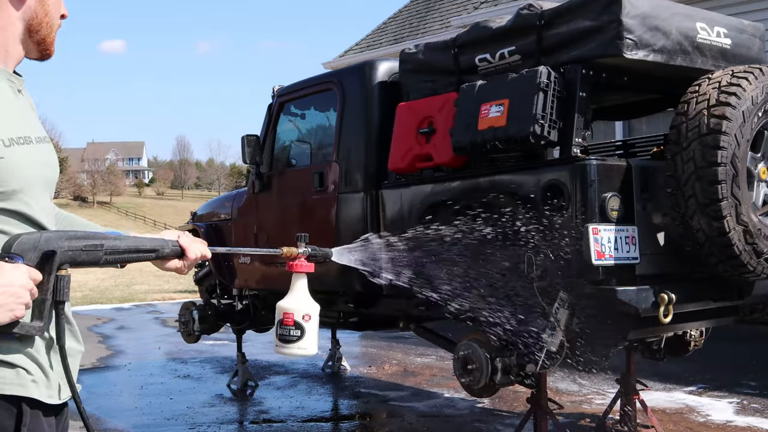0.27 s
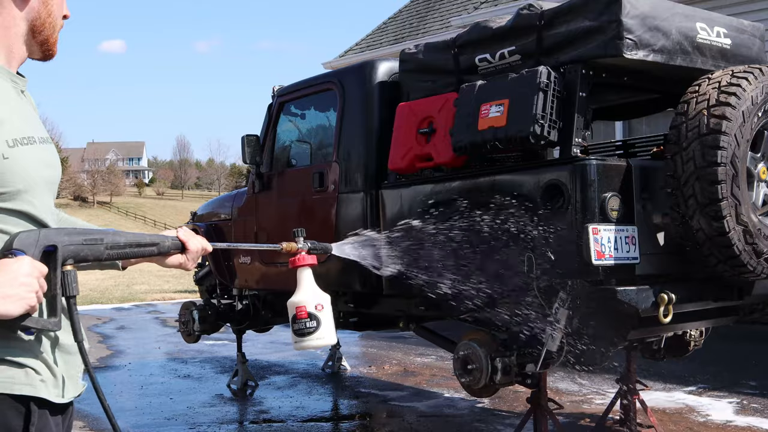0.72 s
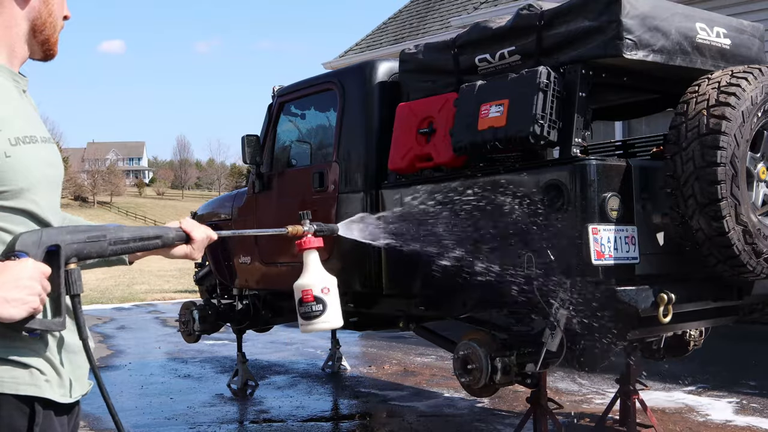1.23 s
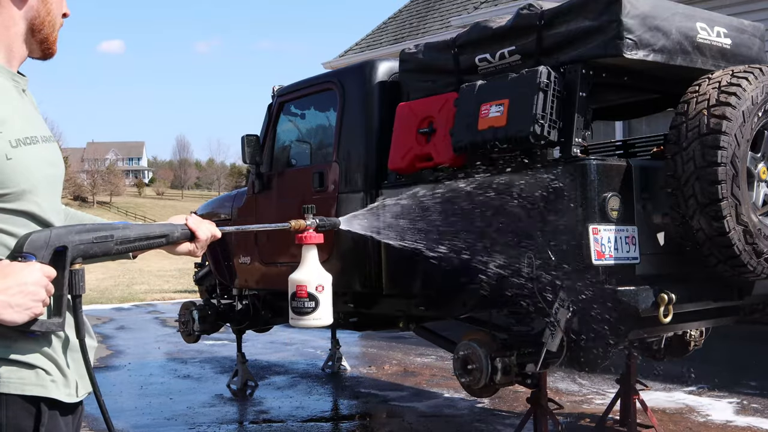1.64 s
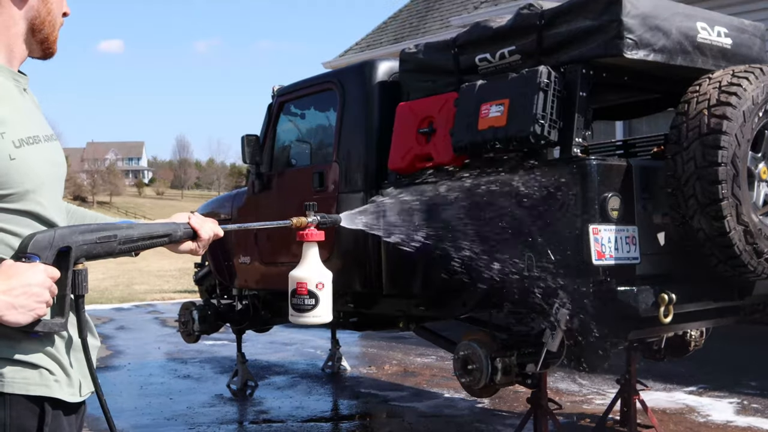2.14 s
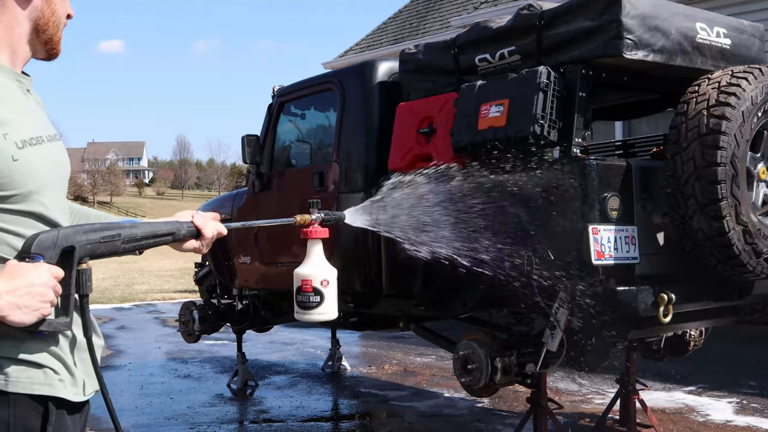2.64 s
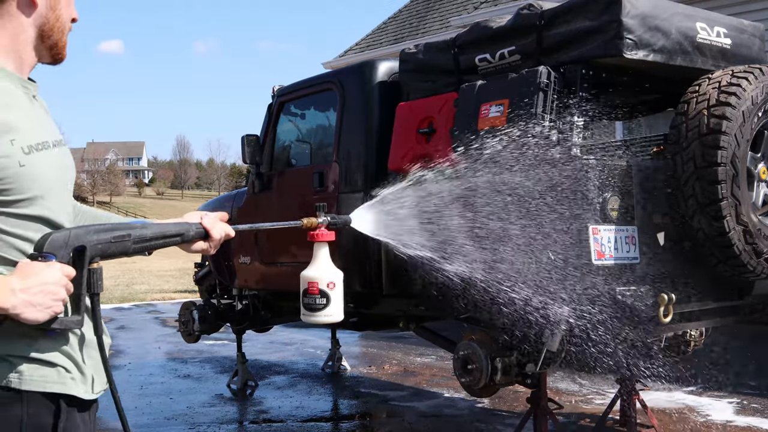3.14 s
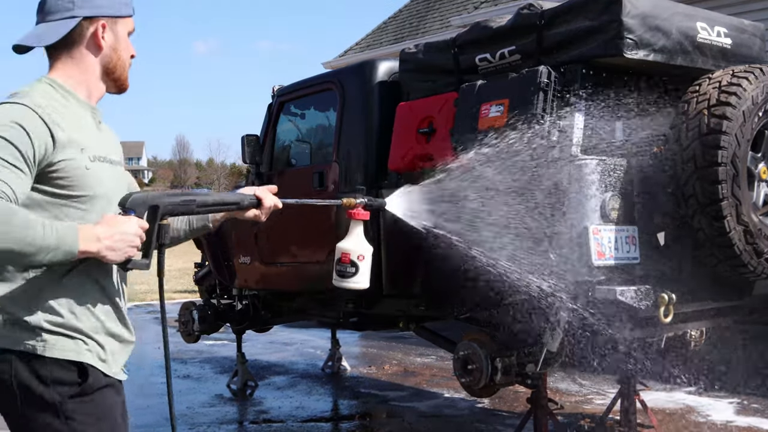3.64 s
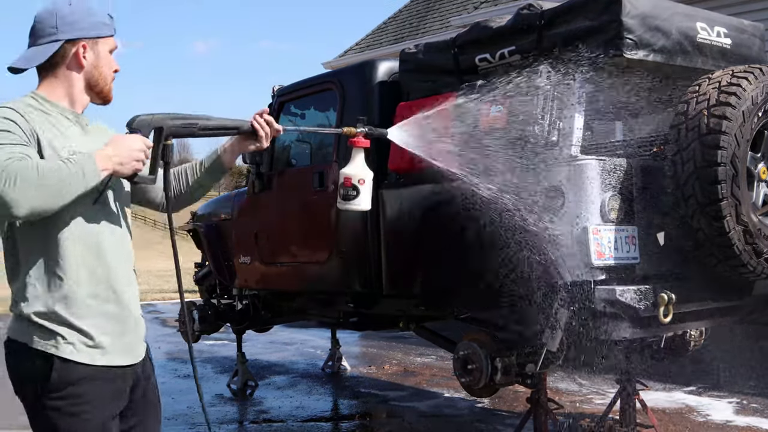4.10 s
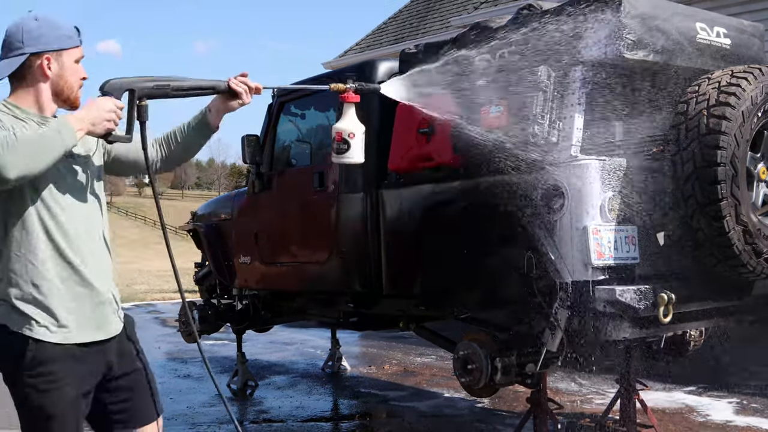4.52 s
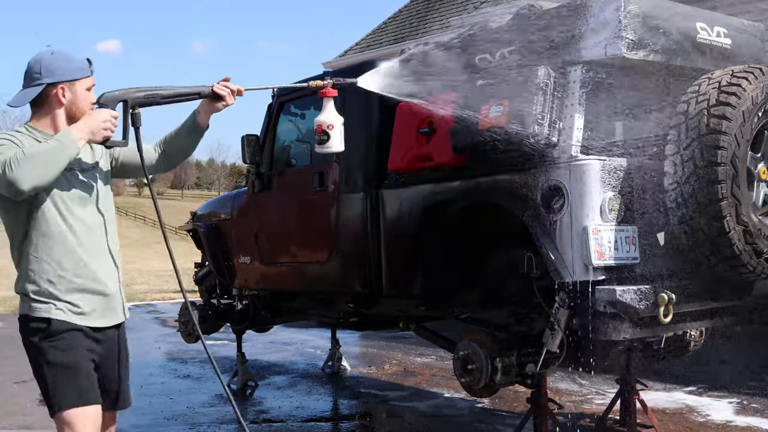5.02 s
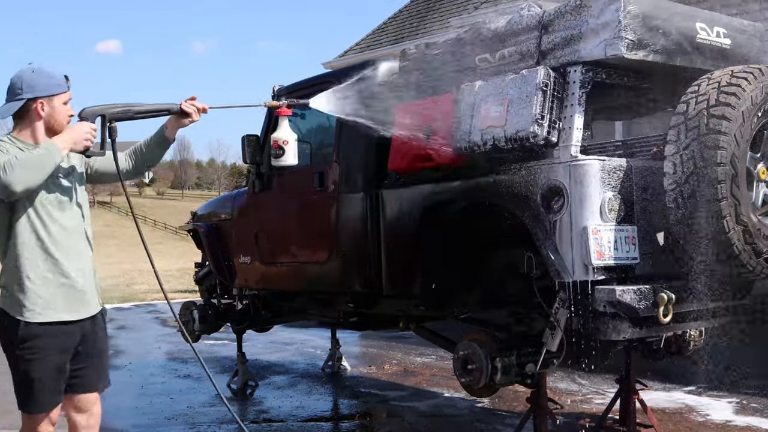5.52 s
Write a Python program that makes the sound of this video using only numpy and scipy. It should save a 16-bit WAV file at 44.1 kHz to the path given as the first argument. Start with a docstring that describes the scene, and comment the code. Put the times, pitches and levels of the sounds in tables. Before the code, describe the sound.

An electric pressure washer runs outdoors for the whole six seconds or so, heard in stereo and mostly on the left. Its pump makes a hard, fast buzz, with a high gear whine and a rushing roar, settling to a steady pitch within the first second. Underneath, foam spray hits a vehicle's body as a dense, finely pattering hiss. From about 2.6 to 3.4 seconds the top of the hiss dulls slightly. Around 4 seconds the roar and spray lift a little. From about 4.4 to 5 seconds the buzz turns hollow and the roar thins, then the earlier tone returns. At about 5.1 seconds the spray grows louder and brighter, and two fat drops hit a panel with very short, bright ticks at about 5.4 and 5.6 seconds. The machine and spray are still going at the end.

```python
"""A hard buzz with a whine and a roar on the left, over the hiss of foam on a car body, outdoors in stereo.
It is an electric pressure washer: a fast motor drives a three-piston pump through gears.
Periodic valve knocks make the buzz, meshing teeth the whine, and fan, casing and water the roar.
For about half a second the buzz turns hollow and shifts colour, and the roar's middle thins.
The spray is a dense patter of impacts; near the end it grows louder and two fat drops ring on a panel."""
import sys
import numpy as np
from scipy import signal
from scipy.fft import rfft, irfft
from scipy.io import wavfile
from scipy.ndimage import uniform_filter1d

SR = 44100
rng = np.random.default_rng(int(sys.argv[2]) if len(sys.argv) > 2 else 0)


def store_wav(level_fs):
    """Save 16-bit WAV to argv[1]."""
    pcm = np.round(np.clip(np.atleast_2d(level_fs), -1, 1) * 32767)
    wavfile.write(sys.argv[1], SR, pcm.T.astype(np.int16))


N = 254016
STEP = 64  # samples between the ticks of slow controls
TICKS = np.arange(0, N + STEP, STEP)
TICK_S = TICKS / SR

# Valve knocks in one shaft turn: place_turns, strength
KNOCKS = [(.015, .82), (.345, .61), (.5, .83), (.743, .38), (.822, .77)]


def pump_buzz(angle, hollow, spin_up, late):
    """Periodic impacts give a harmonic series; its levels and phases shift as the buzz turns hollow."""
    # Knock spectrum: shaft_multiple, steady_db, hollow_db, spin_up_db, late_db
    harmonics = [(1, -58, -62, -58, -59), (2, -57, -58, -58, -58), (3, -31, -42, -30, -32),
                 (4, -32, -27, -40, -33), (5, -23, -22, -20, -25), (6, -25, -30, -26, -27),
                 (7, -32, -26, -38, -31), (8, -28, -36, -28, -27), (9, -24, -31, -22, -23),
                 (10, -31, -24, -29, -27), (11, -32, -32, -36, -32), (12, -42, -55, -39, -35),
                 (13, -28, -39, -31, -28), (14, -30, -43, -28, -30), (15, -45, -32, -39, -47),
                 (16, -43, -41, -37, -39), (17, -39, -42, -35, -40), (18, -43, -43, -44, -42),
                 (20, -37, -39, -38, -40), (21, -43, -36, -42, -41), (22, -38, -46, -37, -42),
                 (23, -41, -51, -37, -41), (25, -40, -39, -35, -40), (26, -40, -48, -38, -43),
                 (27, -41, -44, -42, -56), (30, -36, -36, -37, -37), (31, -40, -44, -39, -45)]
    (place, strength), *rest = KNOCKS
    blows = [(place, strength * (1 - hollow)), *rest]
    shares = [hollow, spin_up, late * (1 - hollow)]  # the hollow colour overrides the late one
    shift_rad = -.19 + .88 * hollow
    buzz = 0
    for multiple, steady_db, *state_db in harmonics:
        phase = multiple * angle + impact_phase(multiple, blows) + shift_rad
        buzz += tone(phase, blend(steady_db, state_db, shares), drift_db=.45, jitter=.043)
    return buzz


def gear_whine(angle, spin_up, late):
    """Teeth mesh at tooth count times shaft rate; modulation adds sidebands, the motor its own tones."""
    # Mesh tone, overtones and sidebands: shaft_multiple, steady_db, spin_up_db, late_db
    mesh_tones = [(39, -46, -45, -47), (40, -44, -43, -45), (45, -44, -46, -46), (46, -41, -43, -43),
                  (49, -38, -34, -39), (50, -29, -28, -28), (52, -46, -44, -41), (55, -42, -43, -46),
                  (58, -44, -56, -48), (59, -36, -37, -41), (60, -39, -40, -43), (61, -42, -40, -41),
                  (62, -44, -39, -44), (66, -41, -47, -38), (68, -35, -45, -33), (76, -46, -43, -48),
                  (78, -41, -40, -42), (92, -48, -49, -46), (93, -40, -41, -42), (94, -47, -56, -51),
                  (96, -43, -45, -44), (98, -41, -40, -44), (100, -32, -34, -37), (101, -32, -34, -36),
                  (102, -39, -37, -39), (103, -39, -46, -40), (104, -41, -46, -51), (106, -45, -56, -44),
                  (107, -50, -47, -55), (111, -49, -52, -52), (150, -55, -54, -57)]
    # Tight spots of the wheel, phasing the mesh tone and its overtones: place_turns, strength
    mesh_spots = [(.061, .5), (.311, .7), (.605, .15)]
    overtone_spots = [(.666, .42), (.732, .47)]
    # Motor tones: motor_multiple, added_shaft_multiple, level_db
    motor_tones = [(-1, 7, -57), (1, -1, -49), (1, 2, -41), (-1, 14, -41), (1, 6, -41), (1, 18, -45),
                   (1, 27, -45), (10, 0, -50), (12, 0, -44), (15, 0, -37), (16, 0, -46), (21, 1, -49),
                   (23, 0, -45), (23, 1, -47)]
    wheel_teeth, pinion_teeth = 50, 11
    motor_angle = angle * wheel_teeth / pinion_teeth
    whine = 0
    for multiple, steady_db, *state_db in mesh_tones:
        spots = mesh_spots if multiple < 1.7 * wheel_teeth else overtone_spots
        phase = multiple * angle + impact_phase(multiple, spots)
        whine += tone(phase, blend(steady_db, state_db, [spin_up, late]), drift_db=1.2, jitter=.095)
    for motor_multiple, shaft_multiple, level_db in motor_tones:
        phase = motor_multiple * motor_angle + shaft_multiple * angle + rng.uniform(0, 2 * np.pi)
        whine += tone(phase, level_db, drift_db=1.2, jitter=.26)
    return whine


def machine_roar(angle, hollow, raised):
    """Amplitude modulation: broad noise flares after the knocks; its middle thins in the hollow spell."""
    # Roar of fan, casing and water: frequency_hz, relative_density_db
    spectrum = [(30, -72), (100, -58), (170, -50), (300, -40.5), (400, -35), (750, -35.5), (850, -37.5),
                (1150, -35.5), (1400, -39), (2100, -38.5), (2950, -45.5), (4000, -38), (4600, -39.5),
                (5400, -40), (6300, -45), (7200, -43), (8500, -56), (12000, -66)]
    flares = 0
    for index, (place, strength) in enumerate(KNOCKS):
        weight = 1 - hollow if index == 0 else 1
        age_turns = (angle / (2 * np.pi) - place) % 1
        flares += strength * weight * np.exp(-age_turns / .08)
    throb = 1 + .69 * (flares - np.mean(flares)) + .066 * np.cos(angle + 2.2)
    spin_up = 1 - ramp(.36, takes_s=.5)
    level_db = -19.7 + 1.5 * spin_up + 1.3 * raised
    noise = band_noise(spectrum, swell_db=-.53, flicker_db=1, dull_db=.98 * hollow, octaves=(10, 11))
    return per_sample(undb(level_db)) * per_sample(throb) * noise


def foam_spray(raised):
    """Dense random impacts merge into a hiss, roughened by a patter of drops."""
    # Spray on the panels: frequency_hz, relative_density_db
    spectrum = [(1500, -50), (4000, -32.5), (8500, -31), (10500, -31), (12000, -33), (14000, -36.5),
                (16000, -38)]
    leaves = ramp(2.6, takes_s=.8)  # the jet leaves the near panel and the top dulls
    lands = ramp(5.12, takes_s=.18)  # it lands on the roof boxes, louder and brighter
    dull_db = 4.1 * leaves * (1 - .45 * lands)
    landing_db = 6.3 * lands - 2.2 * np.maximum(TICK_S - 5.3, 0)
    level_db = -40.1 - .45 * TICK_S + 1.4 * raised + landing_db
    grain_samples = 40
    grains = undb(1.4 * rng.exponential(size=N // grain_samples + 1))
    grains /= np.sqrt(np.mean(grains ** 2))
    patter = uniform_filter1d(np.repeat(grains, grain_samples)[:N], size=30)
    gain = per_sample(undb(level_db + .8 * wander(25)))
    hiss = band_noise(spectrum, swell_db=.15, flicker_db=.9, dull_db=dull_db, octaves=(14,))
    return gain * patter * hiss


def fat_drops():
    """Damped free vibration: each drop on a panel excites one short, bright ring."""
    # Drop impacts: start_s, level_db, pitch_hz, t60_s
    impacts = [(5.378, -15, 5700, .015), (5.594, -15, 5600, .018)]
    rings = 0
    for start_s, level_db, pitch_hz, t60_s in impacts:
        age_s = np.maximum(np.arange(N) / SR - start_s, 0)
        rings += undb(level_db - 60 * age_s / t60_s) * np.sin(2 * np.pi * pitch_hz * age_s)
    return rings


def shaft_angle():
    """Phase in radians is the integral of speed: the shaft spins up, droops slowly and sags at the end."""
    shortfall_hz = 1.27 * np.exp(-TICK_S / .28)
    sag_hz = .07 * ramp(5.05, takes_s=.4)
    shaft_hz = 70.51 - shortfall_hz - .014 * TICK_S - sag_hz
    return 2 * np.pi * np.cumsum(shaft_hz) * STEP / SR


def right_capsule(tones, direct, scattered):
    """Partial coherence: the far capsule hears a mostly weaker, lagging sound with scattered noise."""
    # Right capsule against left: frequency_hz, tone_loss_db, noise_loss_db, lag_rad, coherence
    response = [(40, -3, 5, .1, 0.9), (111, 1, 0, 0.27, 0.9), (200, 3, 0.5, 1.06, 0.87),
                (354, 10.5, -0.5, 1.3, 0.54), (716, 10.5, 16, 1.36, 1), (1300, 18.5, 12, 1.73, 0.5),
                (2500, 26, 14, 0.53, 0.7), (4560, 12.5, 21, 1.85, 0), (8000, 15.5, 14.5, 1, .1),
                (15000, 18, 17.5, 1, 0.2)]
    tone_loss_db, noise_loss_db, lag_rad, coherence = on_bins(response)
    noise = coherence * rfft(direct) + np.sqrt(1 - coherence ** 2) * rfft(scattered)
    spectrum = undb(-tone_loss_db) * rfft(tones) + undb(-noise_loss_db) * noise
    return irfft(np.exp(-1j * lag_rad) * spectrum, N)


def tone(phase, rms_db, drift_db, jitter):
    """Random amplitude and phase modulation roughen a sinusoid whose level drifts slowly."""
    amplitude = np.sqrt(2) * undb(rms_db + drift_db * wander(4))
    amplitude *= 1 + jitter * wander(60)
    return per_sample(amplitude) * np.cos(per_sample(phase + jitter * wander(40)))


def band_noise(spectrum, swell_db, flicker_db, dull_db, octaves):
    """Two incoherent noises whose octave bands swell together and flicker alone; listed octaves dull."""
    colour = undb(on_bins(spectrum)[0]) * np.sqrt(SR / 2)
    bin_hz = np.arange(N // 2 + 1) * SR / N + 1
    white = rfft(rng.standard_normal((2, N)))
    swell = wander(1.48)
    pair = 0
    for octave in range(5, 15):  # centred on 2 ** octave Hz
        band = np.cos(np.pi / 2 * np.clip(np.log2(bin_hz) - octave, -1, 1)) ** 2
        band_db = swell_db * swell + flicker_db * wander(12) - dull_db * (octave in octaves)
        pair += per_sample(undb(band_db)) * irfft(white * colour * band, N)
    return pair


def impact_phase(multiple, blows):
    """Fourier series: the blows in one turn add as phasors to set the phase of a harmonic."""
    return np.angle(sum(strength * np.exp(-2j * np.pi * multiple * place) for place, strength in blows))


def blend(steady_db, state_db, shares):
    """Interpolation in dB from the steady level toward each other state by its share."""
    return steady_db + sum(share * (db - steady_db) for db, share in zip(state_db, shares))


def on_bins(table):
    """Interpolation of a table's columns over log frequency onto the FFT bins."""
    hz, *columns = np.transpose(table)
    bin_hz = np.arange(N // 2 + 1) * SR / N + 1
    return [np.interp(np.log(bin_hz), np.log(hz), column) for column in columns]


def wander(rate_hz):
    """Slow noise: Gaussian values joined by straight lines, at the ticks."""
    count = int(N * rate_hz / SR) + 3
    return np.interp(TICK_S * rate_hz, np.arange(count), rng.standard_normal(count))


def ramp(start_s, takes_s):
    """Linear rise from 0 to 1, at the ticks."""
    return np.clip((TICK_S - start_s) / takes_s, 0, 1)


def per_sample(control):
    """Linear interpolation from ticks to samples."""
    return np.interp(np.arange(N), TICKS, control)


def undb(db):
    """Amplitude ratio of a level in dB."""
    return 10 ** (np.asarray(db) / 20)


def scene():
    """Superposition of tones and noise at two capsules; the left one faces the machine."""
    angle = shaft_angle()
    hollow = ramp(4.4, takes_s=.17) - ramp(4.94, takes_s=.13)  # the buzz briefly turns hollow
    spin_up = 1 - ramp(.36, takes_s=.3)  # the spin-up colour holds, then fades
    late = ramp(3.3, takes_s=1.2)  # the late colour grows as the lance is raised
    raised = ramp(3.6, takes_s=.4) - ramp(4.7, takes_s=.4)  # the raised lance lifts roar and spray
    tones = pump_buzz(angle, hollow, spin_up, late) + gear_whine(angle, spin_up, late) + fat_drops()
    direct, scattered = machine_roar(angle, hollow, raised) + foam_spray(raised)
    return np.array([tones + direct, right_capsule(tones, direct, scattered)])


def record(dry):
    """Band limiting: two passes of a steep low-pass filter cut the top above 15.9 kHz."""
    low_pass = signal.ellip(14, .1, 80, 15900, fs=SR, output="sos")
    return signal.sosfilt(low_pass, signal.sosfilt(low_pass, dry))


dry = scene()
out = record(dry)
store_wav(out)
```